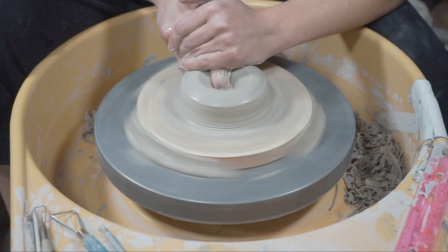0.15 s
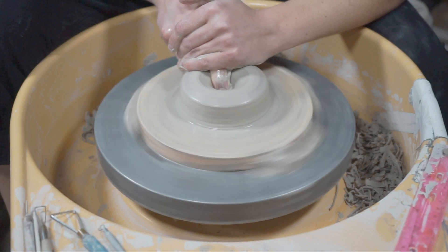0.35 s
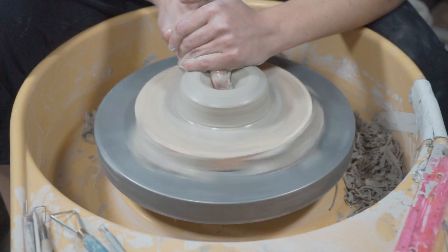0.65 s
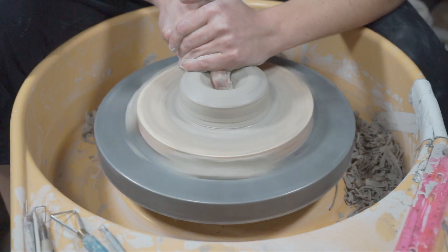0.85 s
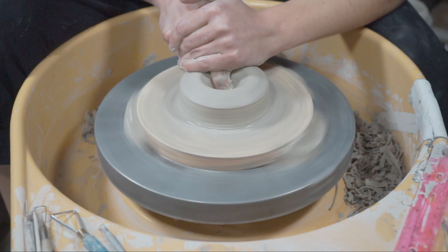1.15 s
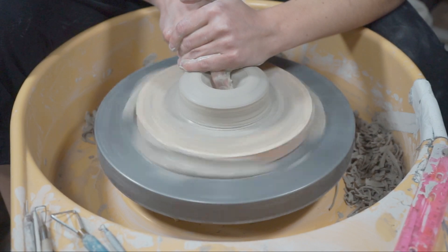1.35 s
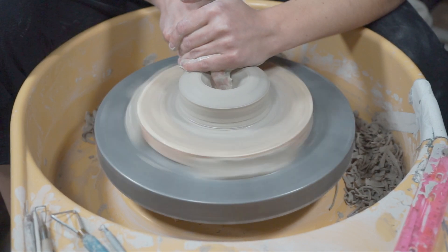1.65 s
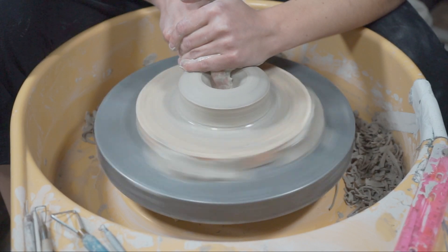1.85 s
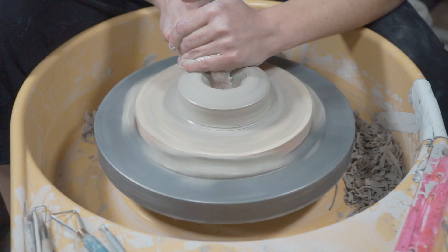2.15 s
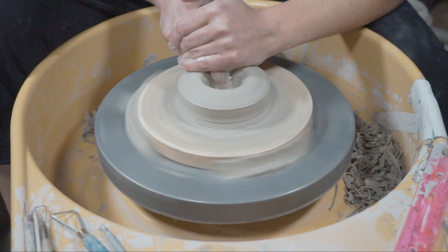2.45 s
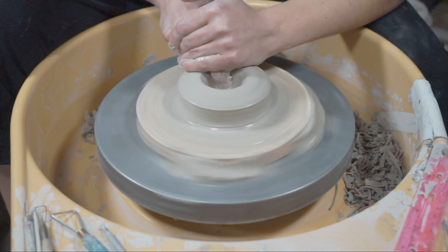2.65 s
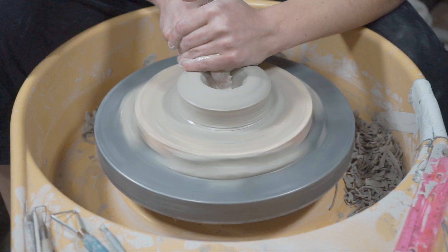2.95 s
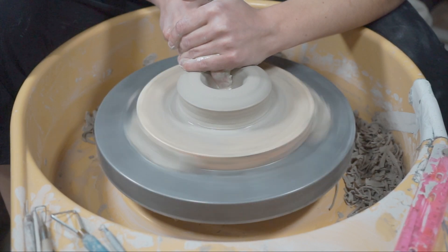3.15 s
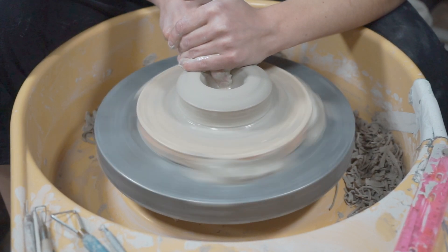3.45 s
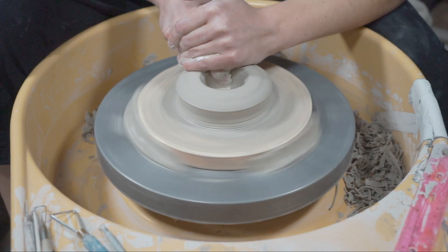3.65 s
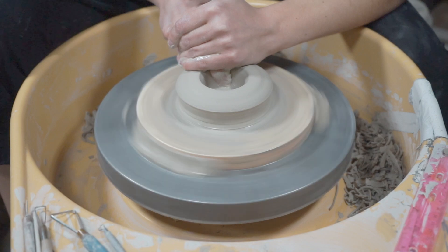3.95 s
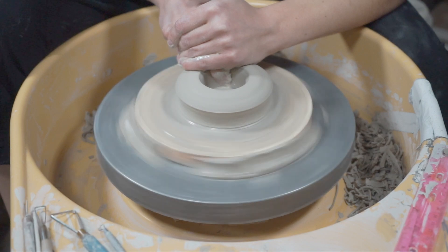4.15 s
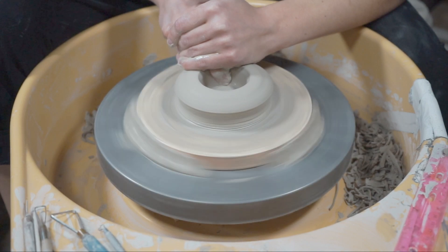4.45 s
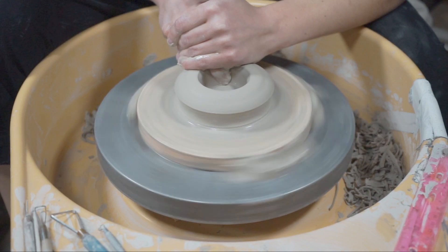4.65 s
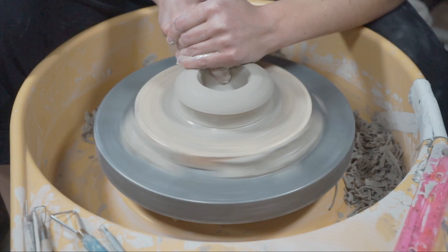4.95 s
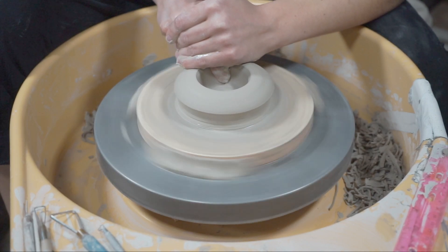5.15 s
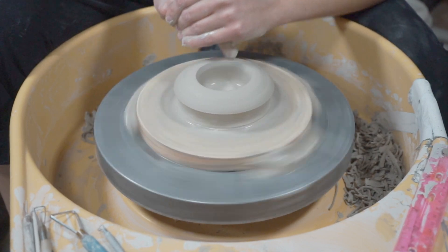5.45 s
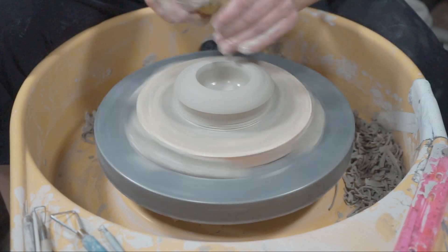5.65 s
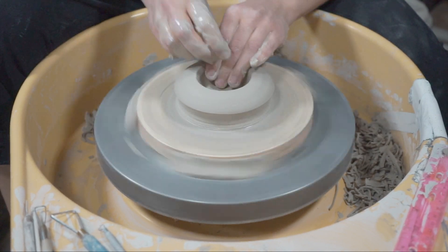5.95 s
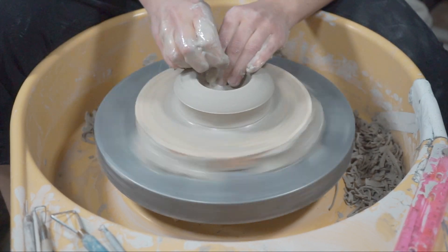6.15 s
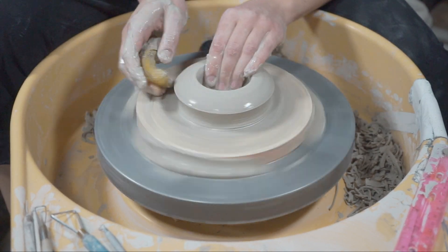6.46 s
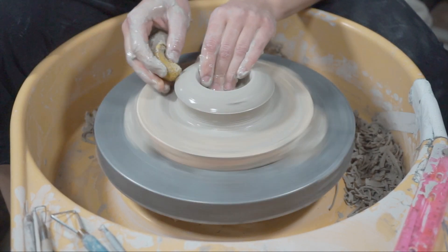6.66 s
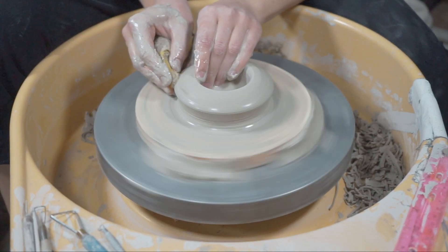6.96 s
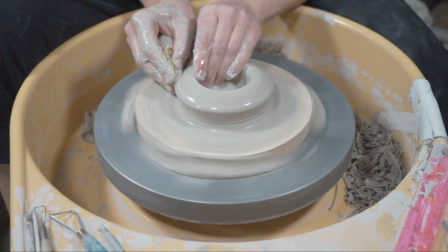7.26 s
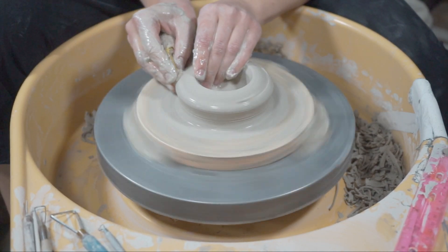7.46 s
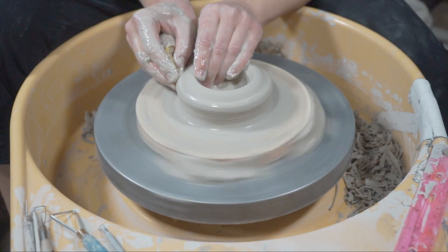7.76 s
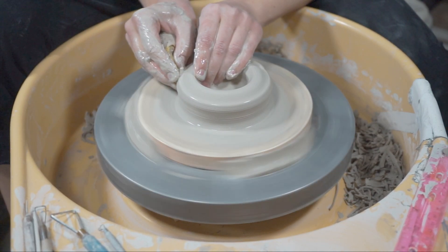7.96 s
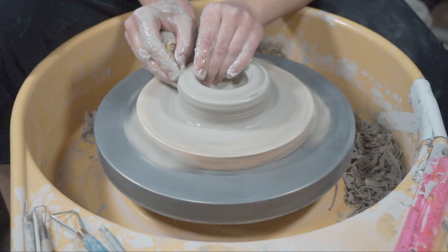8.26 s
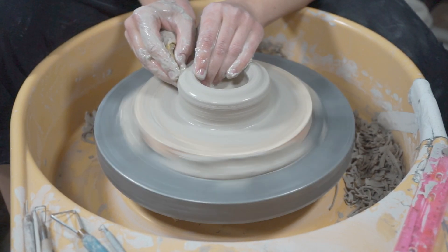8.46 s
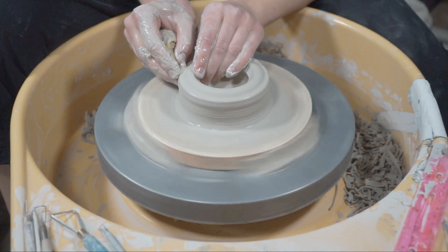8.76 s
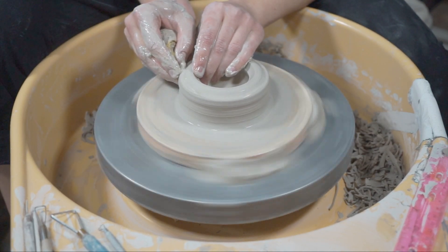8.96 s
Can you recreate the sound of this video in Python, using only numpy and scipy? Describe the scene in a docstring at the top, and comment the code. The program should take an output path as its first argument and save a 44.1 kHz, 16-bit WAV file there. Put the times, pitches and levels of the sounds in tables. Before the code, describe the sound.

A throbbing motor drone with a rough, rapid rattle runs unbroken, while wet hands on clay add soft fizz and small ticks.

```python
"""Electric potter's wheel with wet clay

An electric potter's wheel turns steadily, close by, while wet hands open a lump of clay and then ease off.
Knocks and rubs at fixed places in each shaft turn make the housing throb and rattle about ten times a second:
a harmonic stack and resonant noise, modulated again by the slower wheel head once a revolution.
Mains hum, a thin wavering sine whine and the noise bursts of a wet hiss lie on top, with diffuse room sound."""
import sys
import numpy as np
from scipy import signal
from scipy.fft import rfft, irfft
from scipy.io import wavfile

SR = 44100
rng = np.random.default_rng(int(sys.argv[2]) if len(sys.argv) > 2 else 0)


def int16_out(signal):
    """Quantize to a 16-bit WAV file."""
    q = np.round(np.clip(np.atleast_2d(signal).T, -1, 1) * 32767)
    wavfile.write(sys.argv[1], SR, q.astype(np.int16))


N = 401310
TIME, HZ = np.arange(N) / SR, np.fft.rfftfreq(N, 1 / SR)

WHEEL_RATIO = .2405  # wheel revolutions per shaft turn
START_SPEED, SAG = 10.56266, .0336  # shaft speed and its eventual loss under the hands, turns per s


def from_db(db):
    """Decibels to amplitude gain."""
    return 10 ** (np.asarray(db) / 20)


def unit(x):
    """Normalises to rms 1."""
    return x / np.sqrt(np.mean(x ** 2) + 1e-20)


def read(points):
    """Interpolates a spectrum linearly on a logarithmic frequency axis."""
    hz, value = np.transpose(points)
    return np.interp(np.log(HZ + 1), np.log(hz), value)


def colour(x, gain):
    """Zero-phase filtering: multiplies the spectrum by a gain at every frequency."""
    return irfft(rfft(x) * gain, N)


def drift(hz):
    """Low-passed noise of rms 1: random motion up to about this rate."""
    return unit(colour(rng.standard_normal(N), 1 / (1 + (HZ / hz) ** 4)))


def band(hz, centre_hz, octaves):
    """A Gaussian bell on the log-frequency axis."""
    return np.exp(-.5 * (np.log2((hz + 1) / centre_hz) / octaves) ** 2)


def swell(at_s, spread_s):
    """A Gaussian bell in time."""
    return np.exp(-.5 * ((TIME - at_s) / spread_s) ** 2)


def shaft(settle_s=3.318, lift_at_s=6.108, lift_s=.75, lift_gain=.0213, sway_turns=.0035):
    """Phase is the integral of speed: sag under the hands, a gain as they lift off, a sway per revolution."""
    sagging = START_SPEED - SAG * (1 - np.exp(-TIME / settle_s))
    speed = sagging + lift_gain * swell(lift_at_s, lift_s)  # turns per s
    even = np.cumsum(speed) / SR
    return even - sway_turns * np.sin(2 * np.pi * WHEEL_RATIO * even)


def tones(count=112, weakest_db=-53):
    """Resonant selection: narrow drive resonances lift out multiples of the shaft speed, as (multiple, gain)."""
    # resonances of the drive: (centre [Hz], width [Hz], rms of a tone at the centre before load and rub [dB])
    resonances = [(94, 15, -45.5), (128, 7, -45.5), (154.8, 11, -28.2), (199.5, 19, -30), (232, 6, -42.5),
                  (302, 13, -37), (331, 13, -38.3), (401, 8, -42), (538, 6, -41.3), (648.5, 10, -37.7),
                  (675, 6, -41.3), (727, 34, -39.5), (780, 6, -41), (872, 11, -38), (928, 8, -37.8),
                  (1149.5, 6, -39.5)]
    orders = np.arange(1, count)
    order_hz = orders * (START_SPEED - SAG / 2)
    curves = [from_db(db) / (1 + (2 * (order_hz - hz) / width) ** 2) for hz, width, db in resonances]
    gains = np.max(curves, axis=0)
    return [(order, gain) for order, gain in zip(orders, gains) if gain > from_db(weakest_db)]


def hum(turns, waver=0.013, waver_hz=11, scatter_order=60):
    """Fourier synthesis: periodic knocks make a harmonic stack; the wheel's load sets side tones beside it."""
    # knocks in each shaft turn: (place [turns], strength [dB])
    knocks = [(.022, -4.8), (.286, -2.7), (.52, -2.5), (.861, -.8)]
    # side tones: (multiple of shaft speed, added multiple of wheel speed, rms before load and rub [dB],
    # place where tone and side tone add up [wheel revolutions])
    side_tones = [(14, 1, -42, .49), (19, -1, -38.5, .16), (19, 1, -46, .06)]
    place, strength_db = np.transpose(knocks)

    def phase(order):
        """Superposition of the knocks sets the phase; random scatter by the housing grows with the order."""
        scatter = (order / scatter_order) ** 3 * rng.standard_normal()
        knock_sum = np.sum(from_db(strength_db) * np.exp(-2j * np.pi * order * place))
        return 2 * np.pi * order * turns + scatter + np.angle(knock_sum)

    stack = sum(gain * np.cos(phase(order)) for order, gain in tones())
    beside = 0
    for order, wheel, db, at in side_tones:
        wheel_phase = 2 * np.pi * wheel * (WHEEL_RATIO * turns - at)
        beside = beside + from_db(db) * np.cos(phase(order) + wheel_phase)
    return np.sqrt(2) * (stack + beside) * (1 + waver * drift(waver_hz))  # sqrt 2: rms to peak


def track(turns, size=4096):
    """Periodic excitation: the running surface's roughness recurs each turn, between the strong tones."""
    orders = np.exp(2j * np.pi * rng.random(size // 2))
    orders[[order for order, _ in tones()]] = 0
    bumps = irfft(orders, 4 * size)
    return unit(np.interp(turns % 1, np.arange(len(bumps)) / len(bumps), bumps))


def rattle(turns, slip_turns=0.00048, slip_hz=2.0, level_db=-28.0):
    """Source and filter: a slightly slipping rough surface, part of it new, shakes the housing's resonances."""
    # broad colour of the housing: (frequency [Hz], relative level [dB])
    body = [(25.0, -24), (55.0, -14), (95.0, -13), (140.0, 2.5), (210.0, -17.5), (260.0, -20), (320.0, -5),
            (470.0, -16), (650.0, -2.5), (1200.0, -14), (1550.0, -21), (3300.0, -29), (6000.0, -31),
            (10800.0, -39)]
    # resonances of housing and splash pan: (centre [Hz], width [Hz], lift [dB])
    modes = [(159, 9.2, 6), (201.4, 48, 18.5), (290, 25, 1.5), (406.6, 33, 10.5), (486.6, 15.2, 16),
             (574.4, 28, 9), (644.5, 29, 7.5), (726, 28, 0.5), (750, 7.6, -8), (869, 21.5, 14.5),
             (937.4, 46, 12), (1070, 110, 4.5), (1190, 30.4, 10.5), (1227, 85, 5), (1297, 20, 11),
             (1448.5, 62, 12.5), (1679, 138, 10), (1966, 45, 10), (2282, 58, 4.5), (2473, 18, 14.5),
             (2516, 336, 9), (2521, 12.6, 10.5), (2955, 23, 10), (4043, 85, 10.5), (4483, 240, 8),
             (5730, 185, 6), (6320, 840, 5.5)]
    # part of the drive that is new in every turn: (frequency [Hz], share of the power)
    new_share = [(50, 0.5), (200, 0.33), (500, 0.33), (1100, 0.37), (2500, 0.3), (4500, 0.91), (8000, 0.69)]
    repeating = track(turns + slip_turns * drift(slip_hz))
    fresh = np.clip(read(new_share), 0, 1)
    new_noise = colour(rng.standard_normal(N), np.sqrt(fresh))
    drive = colour(repeating, np.sqrt(1 - fresh)) + new_noise
    peaks_db = sum(db / (1 + (2 * (HZ - hz) / width) ** 2) for hz, width, db in modes)
    housing_db = read(body) + peaks_db
    return from_db(level_db) * unit(colour(drive, from_db(housing_db)))


def pressure(ease_at_s=5.9, ease_s=1.0):
    """A smooth step in the hands' weight, from 1 (heavy, pressing the lump open) to -1 (light fingertips)."""
    return np.tanh((ease_at_s - TIME) / ease_s)


def load(x):
    """Loading alters the drive's response: hand weight fades a gain change in, and its opposite when light."""
    # recolouring at full weight, each bell alone: (centre [Hz], spread [octaves], change [dB])
    loaded_bands = [(116, 0.23, -2), (312, 0.13, 0.9), (574, 0.18, -0.1), (724, 0.087, 1.34),
                    (900, .11, -0.8), (2550, .1, 0.34)]
    change = sum((from_db(db) - 1) * band(HZ, hz, octaves) for hz, octaves, db in loaded_bands)
    return x + pressure() * colour(x, change)


def rub(x, turns, load_db=0.63, heavy_place=0.073, load_hz=1400, load_octaves=0.91, uneven=0.063):
    """Amplitude modulation by band: the sound changes at each rubbing spot and once per wheel revolution."""
    # rubbing spots in each shaft turn, lifts ahead of levelling:
    # (place [turns], length [turns], centre [Hz], spread [octaves], lift [dB])
    spots = [(.08, 0.031, 640, 0.7, 3.5), (.06, 0.073, 2430, 0.051, 7.5), (.225, 0.011, 1100, 0.77, 4.5),
             (.51, 0.016, 1230, 0.6, 2.5), (.525, 0.013, 2440, 0.21, -9), (.55, 0.017, 590, 0.7, 3.5),
             (.72, 0.058, 1300, 0.54, -0.5), (.78, 0.083, 960, 0.23, 4), (.895, 0.044, 1520, 0.12, 7.5),
             (.94, 0.038, 690, 0.16, 3.5)]
    hz, t, z = signal.stft(x, SR, nperseg=256, noverlap=192)
    angle = np.interp(t, TIME, turns)
    wheel_db = load_db * np.cos(2 * np.pi * (WHEEL_RATIO * angle - heavy_place))
    lift_db = np.outer(band(hz, load_hz, load_octaves), wheel_db)
    for place, length, centre_hz, octaves, db in spots:
        passing = np.round(angle - place).astype(int)
        force = 1 + uneven * rng.standard_normal(len(t))[passing]  # one draw for each passing
        touch = force * np.exp(-.5 * ((angle - place - passing) / length) ** 2)
        lift_db += db * np.outer(band(hz, centre_hz, octaves), touch)
    gain = from_db(lift_db)
    gain /= np.sqrt(np.mean(gain ** 2, axis=1, keepdims=True))  # levelling: rms gain 1 in each band
    return signal.istft(z * gain, SR, nperseg=256, noverlap=192)[1][:N]


def electrics(mains_db=-54.5, buzz_db=-49.5, whine_hz=5240, whine_db=-57.5, wander_hz=4.8, flutter=0.32):
    """Steady sines for 60 Hz mains and its octave; a frequency- and amplitude-modulated sine for motor whine."""
    mains = 2 * np.pi * 60 * TIME
    whine_phase = 2 * np.pi * np.cumsum(whine_hz + wander_hz * drift(11.0)) / SR
    whine = np.sin(whine_phase) * (1 + flutter * drift(25))
    hums = from_db(mains_db) * np.sin(mains) + from_db(buzz_db) * np.sin(2 * mains)
    return np.sqrt(2) * (hums + from_db(whine_db) * whine)


def clay(fizz_hz=8500, octaves=0.37, films_per_s=2500, smack_s=.003, palm_db=-63, finger_db=-61):
    """Random impulses: tiny films of wet clay break as a band-limited fizz, with a few decaying smacks."""
    # wipes of the fingers over the wet clay: (time [s], spread [s], level [dB])
    wipes = [(5.55, .07, -56), (6.03, .06, -59), (6.31, .06, -59)]
    # small smacks of wet clay as the fingers shift: (time [s], level before halving [dB])
    smacks = [(5.55, -46), (5.693, -38), (5.95, -45), (6.009, -43), (6.035, -35), (6.07, -43), (6.363, -45)]
    films = rng.standard_normal(N) * (rng.random(N) < films_per_s / SR)
    wet = band(HZ, fizz_hz, octaves)
    resting = from_db(np.interp(pressure(), [-1, 1], [finger_db, palm_db]))
    wiping = sum(from_db(db) * swell(s, spread_s) for s, spread_s, db in wipes)
    fizz = unit(colour(films, wet)) * np.hypot(resting, wiping)  # powers add
    bursts = sum(from_db(db) * (TIME >= s) * np.exp(-abs(TIME - s) / smack_s) for s, db in smacks)
    return fizz + .5 * bursts * unit(colour(rng.standard_normal(N), wet))


def studio(x, t60=0.27, size=8192):
    """Diffuse reverberation: exponentially decaying noise stands for the studio's scattered reflections."""
    # diffuse sound of the studio: (frequency [Hz], side against mid [dB])
    side_levels = [(60, -7), (92, -28), (140, -23.5), (220, -23.5), (330, -23.5), (510, -22), (790, -20),
                   (1210, -25.5), (1860, -18), (2850, -9), (4380, -9), (6730, -6.5), (10300, -4)]
    tail = rng.standard_normal(size) * from_db(-60 * TIME[:size] / t60)
    reflections = signal.fftconvolve(x, tail / np.linalg.norm(tail))[:N]
    return colour(reflections, from_db(read(side_levels)))


def scene():
    """Mid-side stereo: the wheel straight ahead, reflections of opposite sign at left and right."""
    turns = shaft()
    machine = rub(load(hum(turns) + rattle(turns)), turns)
    mid = machine + electrics() + clay()
    side = studio(mid)
    return np.array([mid + side, mid - side])


def record(dry, edge_hz=11030):
    """Band limiting: a linear-phase low-pass filter removes the highest treble."""
    low_pass = signal.firwin(1501, edge_hz, window=("kaiser", 9), fs=SR)
    return signal.oaconvolve(dry, low_pass[None], "same")


dry = scene()
out = record(dry)
int16_out(out)
```